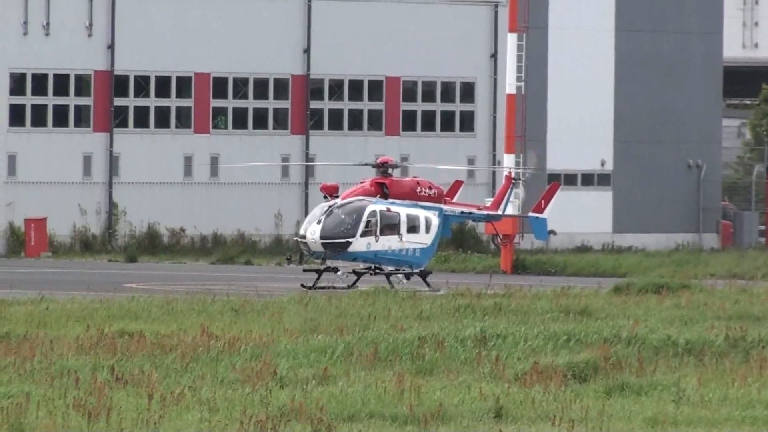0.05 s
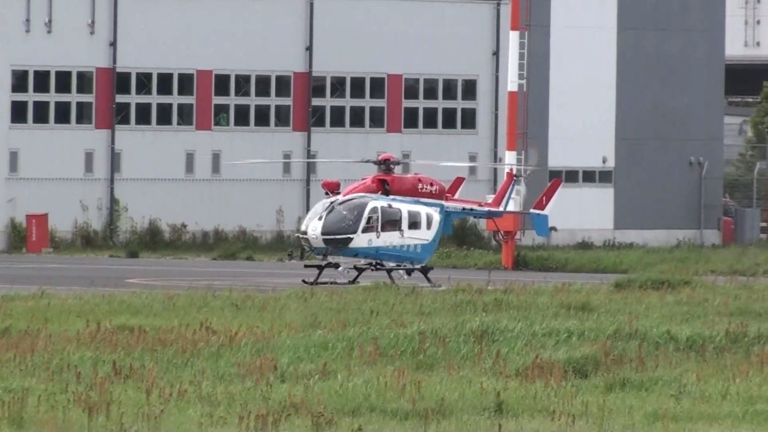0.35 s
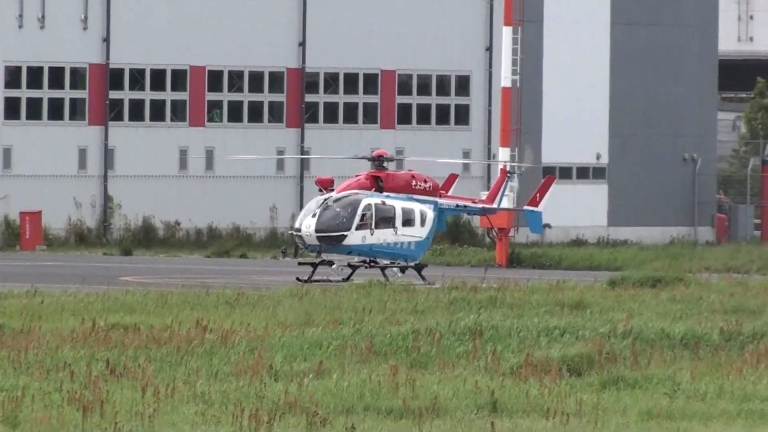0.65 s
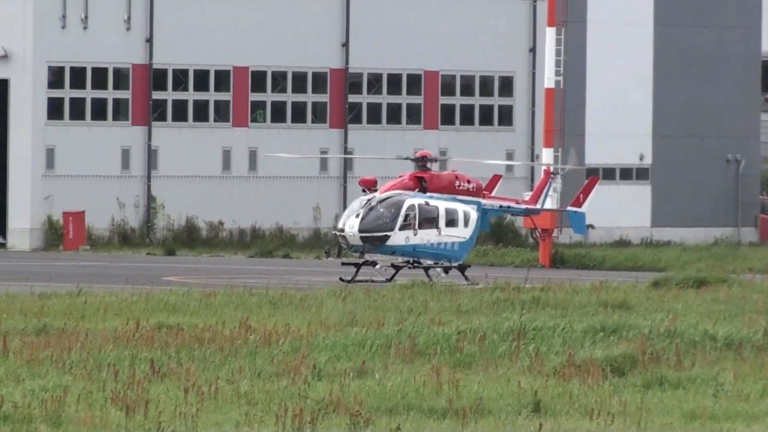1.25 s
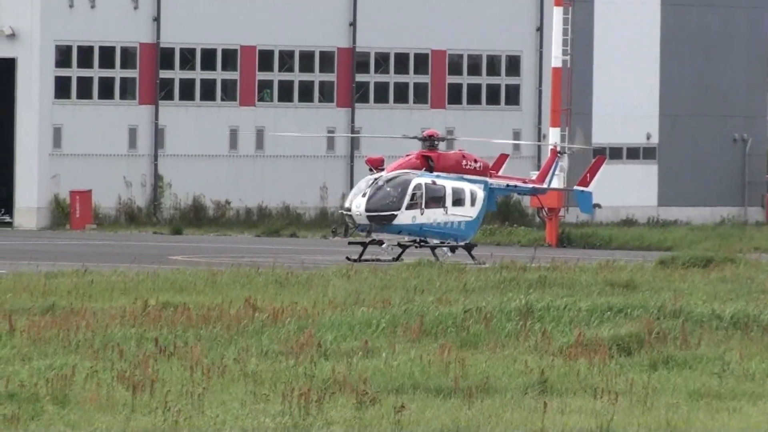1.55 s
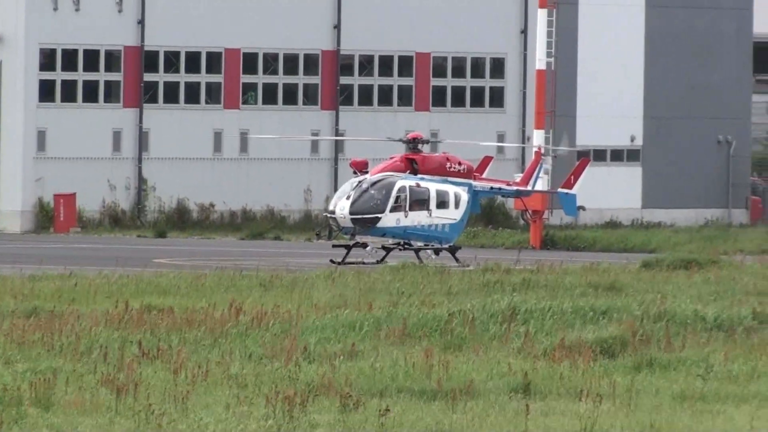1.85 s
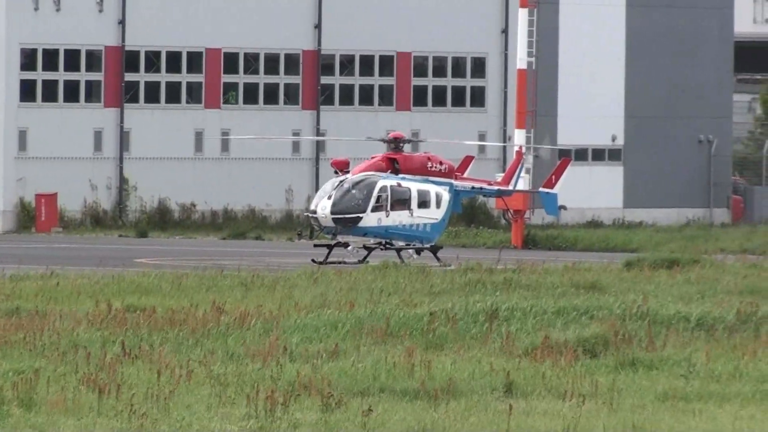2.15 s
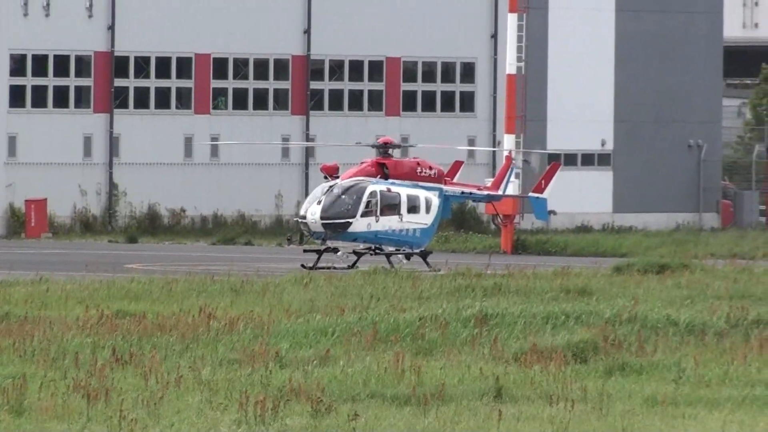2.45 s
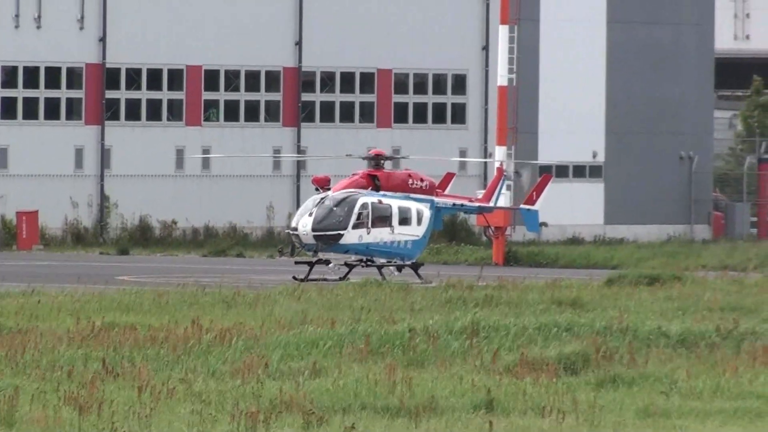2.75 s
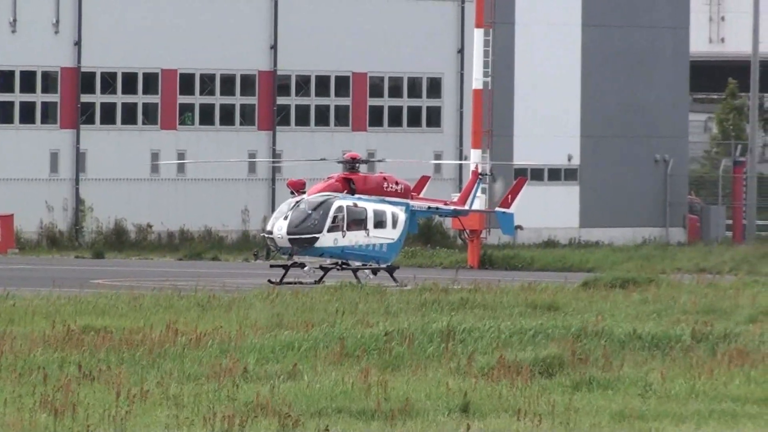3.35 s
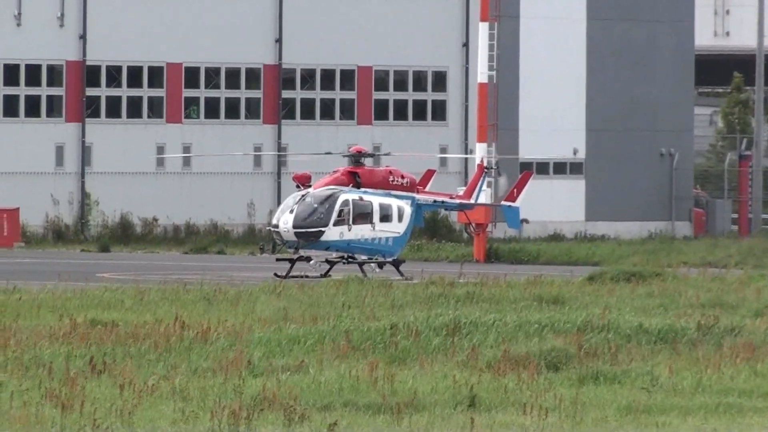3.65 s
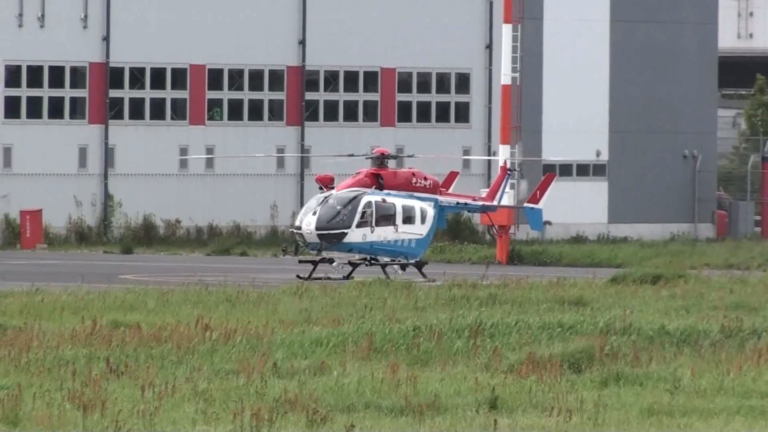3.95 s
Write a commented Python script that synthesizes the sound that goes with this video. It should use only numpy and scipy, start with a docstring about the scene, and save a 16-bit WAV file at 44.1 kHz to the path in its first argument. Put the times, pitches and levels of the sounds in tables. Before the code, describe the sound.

A distant helicopter idles with a steady roar and thin whine, wind buffeting the microphone.

```python
"""The roar and whine of a helicopter idling on an apron, far from the microphone across a grass field.
The turbines' treble swells and fades on the moving air, over the low hum of the tail rotor.
The main blades swish about twenty times a second, much stronger around the one-second mark.
A small bird chirps once at the start, and wind gusts buffet the stereo microphone."""
import sys
import numpy as np
from scipy.fft import rfft, irfft
from scipy.io import wavfile

SR = 44100
rng = np.random.default_rng(int(sys.argv[2]) if len(sys.argv) > 2 else 0)


def unload_audio(sound):
    """Save the sound as a 16-bit wav file, at the path given as the first command line argument."""
    columns = np.transpose(np.atleast_2d(sound))
    # keep every value between -1 and 1, then stretch to whole-number steps
    steps = np.round(np.clip(columns, -1, 1) * 32767)
    wavfile.write(sys.argv[1], SR, steps.astype(np.int16))


N = 176400
TIME = np.arange(N) / SR
FREQS = np.maximum(np.fft.rfftfreq(N, 1 / SR), 1)

# How alike left and right are for far sound: frequency_hz, likeness_ratio
FAR_LIKENESS = [(40, 0.99), (200, .62), (700, 0.93), (1600, 0.92), (4000, 0.8), (8000, .985)]
# Phase by which far sound leads on the left: frequency_hz, lead_rad
FAR_LEAD = [(200, 0.098), (1000, 0.42), (2200, .35), (3000, .2), (4900, 0.25), (5800, 0.38), (8000, 0.3)]
# Faint background hiss: frequency_hz, relative_density_db
HISS_SPECTRUM = [(100, 5), (10000, 7), (16000, -6)]

# Wind strength at the microphone: time_s, strength_db
GUST_STRENGTH = [(0,-88),(.2,-41),(.415,-39.5),(.445,-20),(.55,-27),(.59,-33),(.69,-24),(.75,-17),(.795,-18.5),(.83,-31.5),(.9,-26.5),(1.02,-26.5),(1.11,-29),(1.2,-38),(1.37,-36),(1.41,-26.5),(1.47,-29.5),(1.56,-23),(1.63,-19),(1.72,-17),(1.8,-19),(1.84,-44),(1.95,-29),(2.075,-24),(2.12,-13.5),(2.17,-27),(2.21,-16),(2.24,-24.5),(2.39,-36),(2.435,-26),(2.48,-35.5),(2.62,-39),(2.69,-18.5),(2.85,-16),(2.965,-19.5),(3.005,-16),(3.05,-16),(3.085,-18),(3.122,-22.5),(3.152,-15),(3.22,-29),(3.28,-15),(3.39,-28.5),(3.49,-16),(3.625,-26),(3.665,-24),(3.76,-21),(3.825,-24.5),(3.86,-31),(3.95,-45),(4,-35)]
# Sharp buffets within the gusts: centre_s, lift_db
GUST_THUMPS = [(.441, -0.5), (0.756, 3), (0.793, 3.5), (1.619, 6.5), (1.706, 4.5), (2.706, 3.5), (3.004, 5),
               (3.082, 10), (3.149, 1), (3.271, 5), (3.502, 2), (3.662, 10)]
# Lift of the lowest wind rumble: time_s, lift_db
GUST_DEPTH = [(0, 10), (.45, 1.5), (.8, 4.5), (1.1, 3), (1.3, -12), (1.6, -0.5), (1.9, -4), (2.1, -2.5),
              (2.45, 13), (2.8, -2), (3.1, 5), (3.4, 3), (3.8, 1), (4, 7.5)]
# Rumble in a strong gust: frequency_hz, relative_density_db
WIND_SPECTRUM = [(20, -23), (40, -15.5), (65, -7.5), (115, -0.5), (190, -3.5), (330, -8.5), (550, -16),
                 (1000, -27), (2000, -49.5), (3500, -66)]
# How closely each register follows the gusts: frequency_hz, slope_db_per_db
GUST_RESPONSE = [(30, 1), (100, 0.66), (250, 1.0), (600, 1.42), (2000, 1.35)]
# How alike the wind is at the two microphone ports: frequency_hz, likeness_ratio
PORT_LIKENESS = [(30, 0.46), (80, 0.96), (130, 0.52), (200, 0.59), (290, 0.3), (450, 0.68), (1200, 0.42),
                 (2000, 0.73)]
# Phase by which the wind leads at the left port: frequency_hz, lead_rad
PORT_LEAD = [(30, 0), (190, 0), (270, -0.43), (360, -2.13), (520, -2), (750, -3), (2000, -2.5)]

# Tail rotor hum: harmonic_number, level_db
TAIL_HARMONICS = [(1, -45), (2, -54.5), (3, -57.5), (4, -59)]
# Exhaust and rotor wash: frequency_hz, relative_density_db
ROAR_SPECTRUM = [(25, -11), (55, 11.5), (120, 2), (220, -1), (350, 0), (650, -2), (1150, -7), (1750, -7),
                 (2400, -12.5), (3200, -19), (5000, -32.5), (9000, -37)]
# Slow swell of the roar: time_s, gain_db
ROAR_GAIN = [(0, -1), (.5, 1), (1, 0.6), (1.4, -1), (1.9, -0.5), (2.3, -2), (2.9, 0.5), (3.3, 0.5),
             (3.7, 1.5), (4, 1.5)]
# Compressor rush: frequency_hz, relative_density_db
RUSH_SPECTRUM = [(1500, -6), (3100, 1), (3800, 4.5), (4150, 3), (4420, 1.5), (4800, 1.5), (5300, -3),
                 (6000, 0.5), (6600, -1), (7600, 1.5), (8000, 4.5), (8280, 2.5), (8600, 0), (9100, -7),
                 (10200, -18.5), (12000, -38)]
# How well the air carries the rush across the field: time_s, gain_db
AIR_CARRY = [(0, -0.5), (.2, -0.5), (.34, 0.5), (.55, 0.5), (.68, 0.5), (.78, -1), (.98, 2), (1.2, 2.5),
             (1.35, 4), (1.55, 1), (1.67, 0), (1.75, 1.5), (1.85, 2), (2.2, -1.5), (2.6, -1.5), (2.77, 3),
             (2.86, 2), (2.95, 1.5), (3.03, -2), (3.17, -1), (3.28, -2), (3.48, -3.5), (3.78, -1),
             (4, -1.5)]
# Hoarse whistle in the rush: time_s, level_db
WHISTLE_LEVEL = [(0, -57), (.4, -60), (.75, -62), (1.1, -60), (1.45, -57), (1.7, -66), (1.85, -61),
                 (2.4, -67), (2.62, -63), (2.7, -57), (2.85, -62), (2.92, -51), (2.97, -53), (3.01, -58),
                 (3.45, -68), (4, -63)]
# Turbine tones: pitch_hz, relative_level_db, half_width_hz
WHINE_TONES = [(6862, -74, 25), (7030, -67.5, 16), (8120, -64.5, 45), (8307, -62, 15), (8320, -62, 110)]
# Swells of those tones on the moving air: time_s, gain_db
WHINE_GAIN = [(0, -3), (.25, -5), (.34, 5), (.5, -5), (.68, 0), (.76, -2), (.98, 5), (1.2, -3), (1.35, 6),
              (1.52, -5), (1.67, 6.5), (1.75, -3), (1.85, 4), (2.2, -3), (2.6, -4), (2.73, 3), (2.86, -5),
              (2.96, 5), (3.02, -1), (3.15, -1), (3.28, -6), (3.5, -8), (3.78, -2.5), (4, -3)]
# Strength of the main blades' swish: time_s, gain_db
SWISH_GAIN = [(0, -50.5), (.22, -43.5), (.31, -43), (.41, -45), (.51, -41.5), (.555, -39.5), (.605, -35.5),
              (.655, -39.5), (.705, -39.5), (.76, -45), (.855, -38), (.905, -33), (1.0, -32.5),
              (1.055, -37.5), (1.16, -44.5), (1.45, -44), (2.2, -53.5), (4, -54)]
# Colour of the swish: frequency_hz, relative_density_db
SWISH_SPECTRUM = [(600, -32), (1150, -6), (1550, 7), (2400, 4), (3100, -1.5), (4000, 3.5), (5000, -7.5),
                  (6200, -9), (7500, -15.5), (11000, -37)]
# Brightness of the swish: time_s, upper_over_lower_db
SWISH_BRIGHTNESS = [(0, -10), (.4, 1), (.52, -2), (.61, 12), (.71, 0), (.82, -7), (.91, 3.5), (.96, 0),
                    (1.01, -1), (1.1, -10.5), (1.4, 3.5), (4, -10)]


def from_db(db):
    """Decibels to gain."""
    return 10 ** (np.asarray(db) / 20)


def unit_rms(x):
    """Scale to an rms of 1."""
    return x / np.sqrt(np.mean(x ** 2) + 1e-20)


def in_time(rows):
    """Read a table at every sample."""
    return np.interp(TIME, *np.transpose(rows))


def at_hz(rows, hz):
    """Read a table on a log-frequency axis."""
    row_hz, value = np.transpose(rows)
    return np.interp(np.log(hz), np.log(row_hz), value)


def drift(rate_hz):
    """Smooth random wander with an rms of 1."""
    return unit_rms(irfft(rfft(rng.standard_normal(N)) / (1 + (FREQS / rate_hz) ** 2), N))


def stereo_noise(gain, likeness, lead):
    """Noise at the microphone pair, with a gain, left-right likeness and phase lead per frequency."""
    mid, side = rfft(rng.standard_normal((2, N)))
    alike = np.clip(at_hz(likeness, FREQS), 0, .995)
    sign = np.array([[1], [-1]])
    pair = np.sqrt(1 + alike) * mid + np.sqrt(1 - alike) * side * sign
    phase_turn = np.exp(.5j * sign * at_hz(lead, FREQS))
    return unit_rms(irfft(gain * phase_turn * pair, N))


def far_noise(spectrum):
    """Coloured noise arriving from ahead of the microphone."""
    return stereo_noise(from_db(at_hz(spectrum, FREQS)), FAR_LIKENESS, FAR_LEAD)


def far_tone(hz, half_width_hz):
    """A distant tone blurred into a narrow band of noise."""
    return stereo_noise(1 / (1 + ((FREQS - hz) / half_width_hz) ** 2), FAR_LIKENESS, FAR_LEAD)


def hiss(level_db=-64):
    """A faint, steady hiss behind everything."""
    return from_db(level_db) * far_noise(HISS_SPECTRUM)


def bird(start_s=.054, length_s=.062, pitch_hz=4650, fall_hz=640, peak_db=-42):
    """A small bird gives one thin note that arches downwards."""
    progress = np.clip((TIME - start_s) / length_s, 0, 1)
    hz = pitch_hz - fall_hz * progress ** 2 + 25 * drift(200)
    return from_db(peak_db) * np.sin(np.pi * progress) * np.sin(2 * np.pi * np.cumsum(hz) / SR)


def wind(gain_db=-42, strong_gust_db=-19.5, thump_s=.0045, depth_below_hz=112):
    """Turbulence right on the microphone ports: stronger gusts are louder and brighter."""
    buffets_db = 2.09 * np.clip(drift(87), -2, 2)   # fast pressure swings shared by all bands
    thumps_db = sum(db * np.exp(-.5 * ((TIME - s) / thump_s) ** 2) for s, db in GUST_THUMPS)
    gust_db = in_time(GUST_STRENGTH) - strong_gust_db + buffets_db + thumps_db
    depth_db = in_time(GUST_DEPTH)
    rumble = 0
    for hz in 20 * 2 ** np.arange(0, 8, .5):   # half-octave bands
        band = np.exp(-np.log2(FREQS / hz) ** 2 / .125)
        width_hz = hz * np.log(2) / 2
        eddy_db = 2.18 * drift(33)   # each band also swings alone
        density_db = gain_db + at_hz(WIND_SPECTRUM, hz) + at_hz(GUST_RESPONSE, hz) * gust_db + eddy_db
        density_db += depth_db / (1 + (hz / depth_below_hz) ** 4)
        rumble += np.sqrt(width_hz) * from_db(density_db) * stereo_noise(band, PORT_LIKENESS, PORT_LEAD)
    return rumble


def tail_rotor(blades_per_s=56.24, waver_db=1.5):
    """The tail blades hum, wavering, at their passing rate and its first multiples."""
    passes = np.cumsum(blades_per_s + .31 * drift(2.3)) / SR
    hum = 0
    for harmonic, level_db in TAIL_HARMONICS:
        amplitude = np.sqrt(2) * from_db(level_db + waver_db * drift(1.1))
        hum += amplitude * np.sin(2 * np.pi * (harmonic * passes + rng.random()))
    return hum


def main_rotor(blades_per_s=19.95, pass_at_s=.9548, core_s=.0027, sweep_s=.009, lag_s=.002):
    """Each passing blade throws a burst of noise: a sharp core inside a broader, softer sweep."""
    from_pass_s = (((TIME - pass_at_s) * blades_per_s + .5) % 1 - .5) / blades_per_s
    core = np.exp(-.5 * (from_pass_s / core_s) ** 2)
    sweep = from_db(-4) * np.exp(-.5 * ((from_pass_s - lag_s) / sweep_s) ** 2)
    air = far_noise(SWISH_SPECTRUM)
    lower = irfft(rfft(air) / (1 + (FREQS / 3500) ** 8), N)   # the registers part at 3500 Hz
    upper = air - lower
    tilt = from_db(in_time(SWISH_BRIGHTNESS) / 2)
    return from_db(in_time(SWISH_GAIN)) * np.hypot(core, sweep) * (lower / tilt + upper * tilt)


def turbines(roar_db=-39.5, rush_db=-50, whine_lift_db=3, gearbox_db=-62):
    """Exhaust roar and a gearbox tone; compressor rush, whines and a whistle flutter on the air."""
    roar = from_db(roar_db + in_time(ROAR_GAIN) + .5 * drift(4.6)) * far_noise(ROAR_SPECTRUM)
    rush = from_db(rush_db + in_time(AIR_CARRY) + .5 * drift(14)) * far_noise(RUSH_SPECTRUM)
    tones = sum(from_db(db) * far_tone(hz, half_width) for hz, db, half_width in WHINE_TONES)
    whine = from_db(whine_lift_db + in_time(WHINE_GAIN)) * tones
    whistle = from_db(in_time(WHISTLE_LEVEL)) * far_tone(hz=4444, half_width_hz=75)
    gearbox = from_db(gearbox_db) * far_tone(hz=1491.5, half_width_hz=3)
    return roar + rush + whine + whistle + gearbox


def scene():
    """Helicopter far across the field, a bird ahead, wind on the microphone and faint hiss."""
    return turbines() + main_rotor() + tail_rotor() + bird() + wind() + hiss()


def record(dry):
    """The recorder cuts the top treble steeply."""
    cutoff_hz = 15780
    return irfft(rfft(dry) * (FREQS < cutoff_hz), N)


dry = scene()
out = record(dry)
unload_audio(out)
```